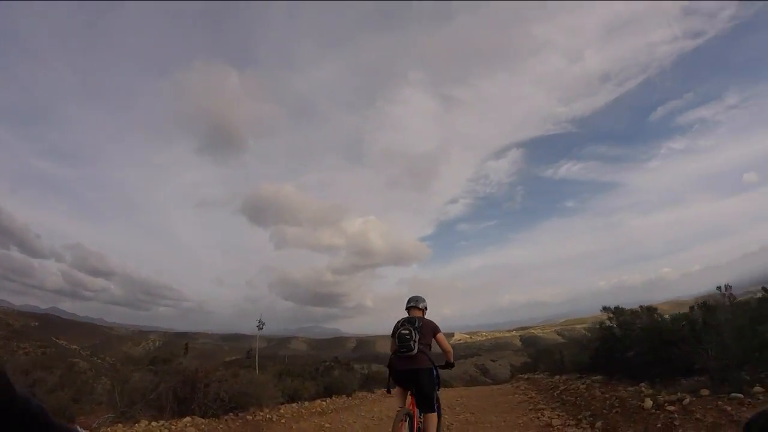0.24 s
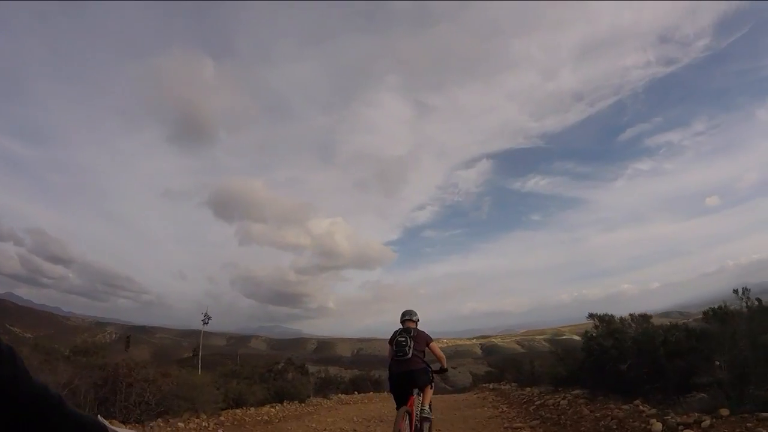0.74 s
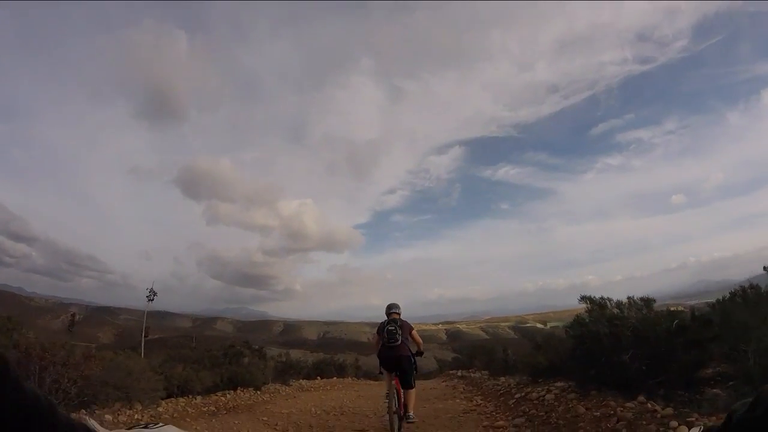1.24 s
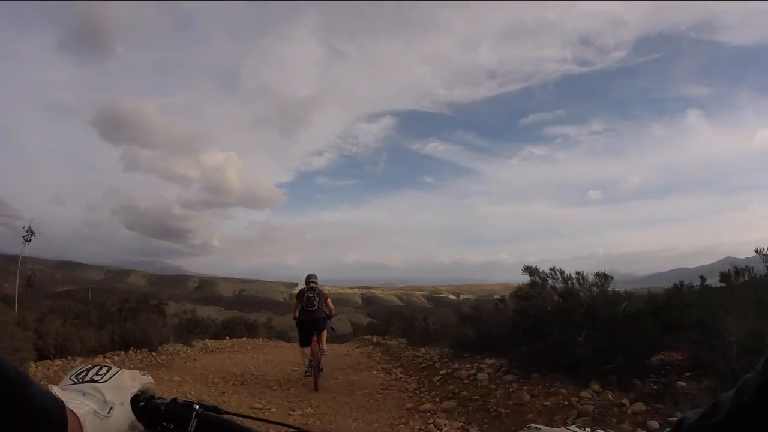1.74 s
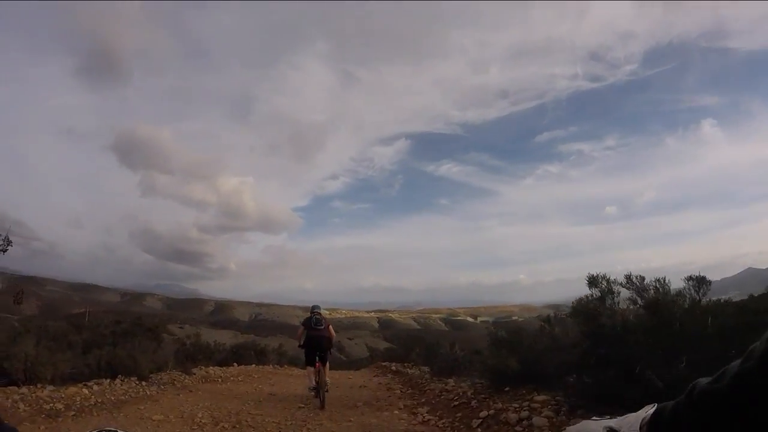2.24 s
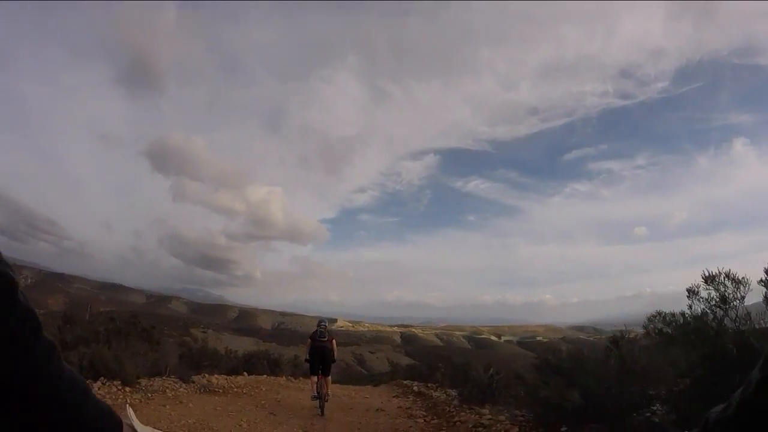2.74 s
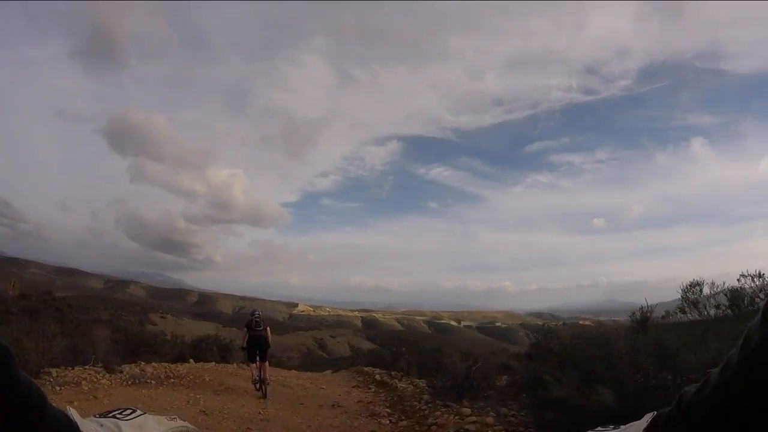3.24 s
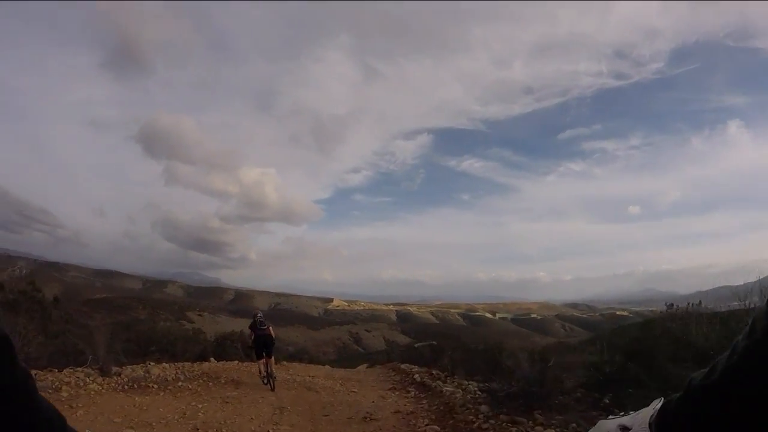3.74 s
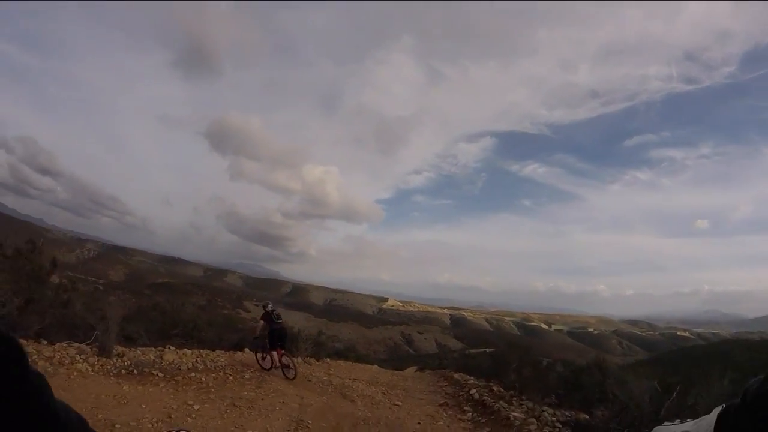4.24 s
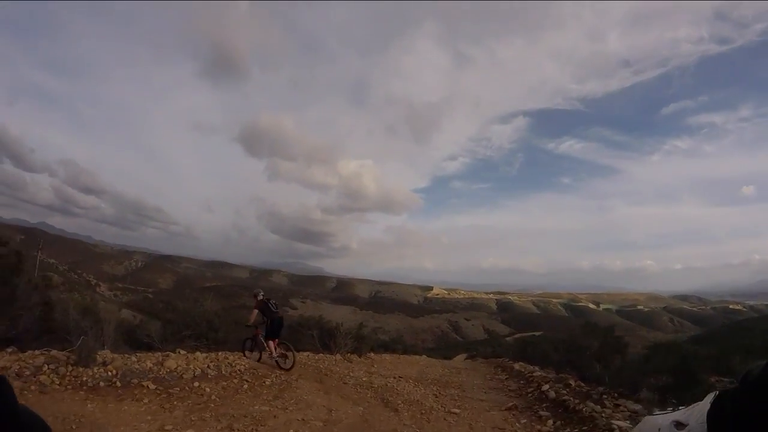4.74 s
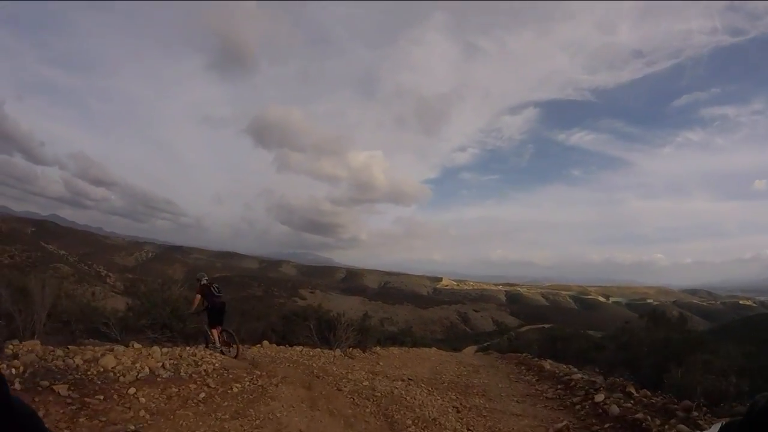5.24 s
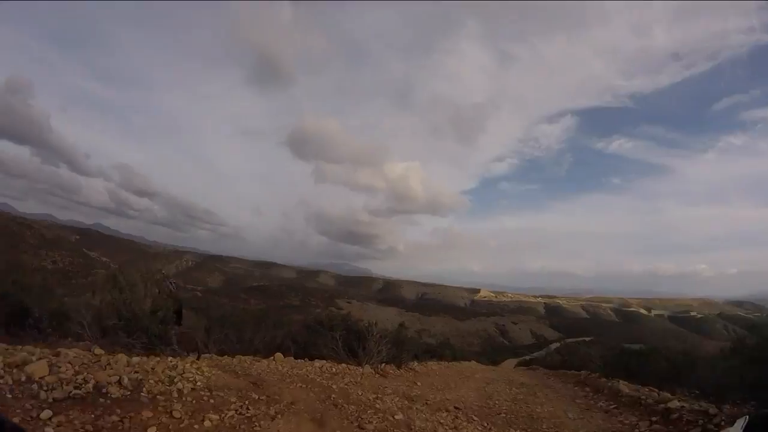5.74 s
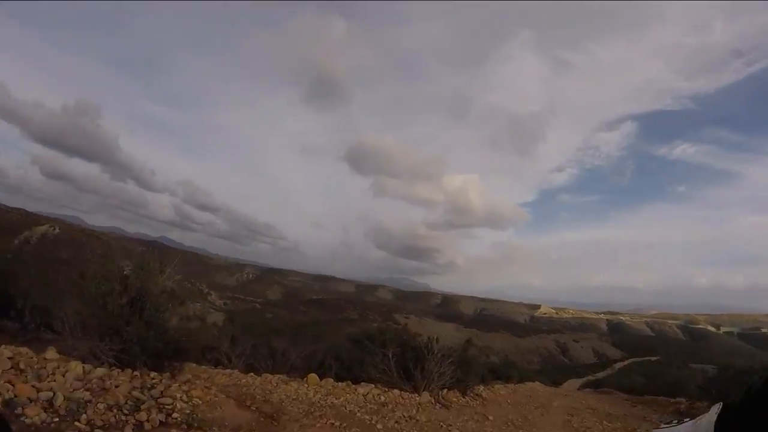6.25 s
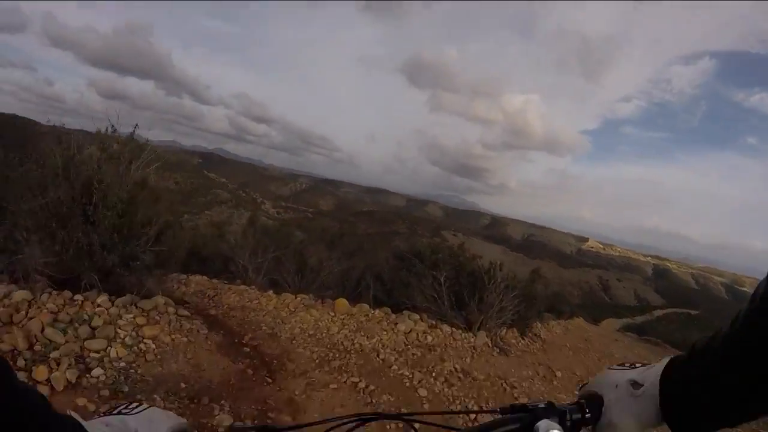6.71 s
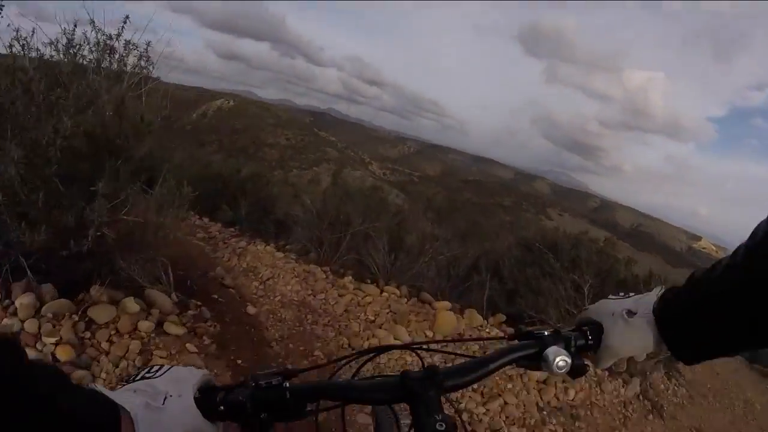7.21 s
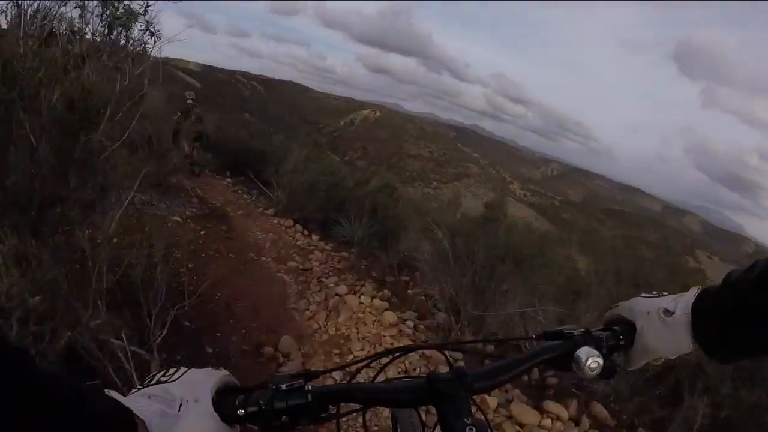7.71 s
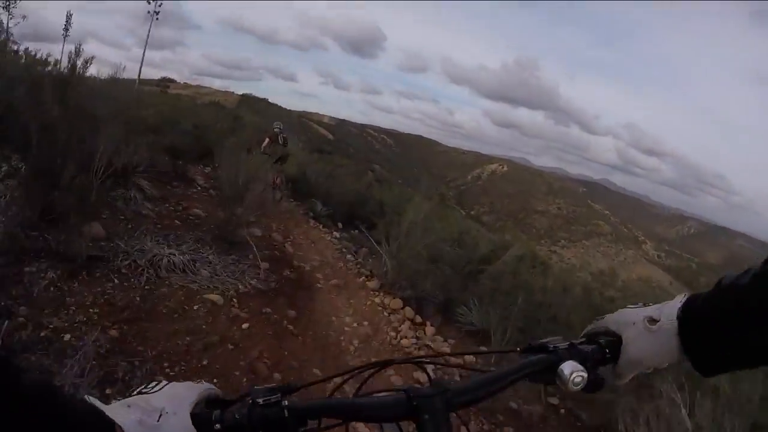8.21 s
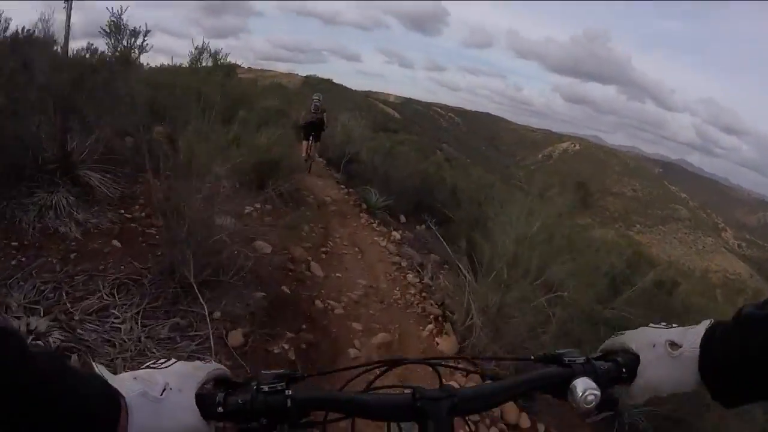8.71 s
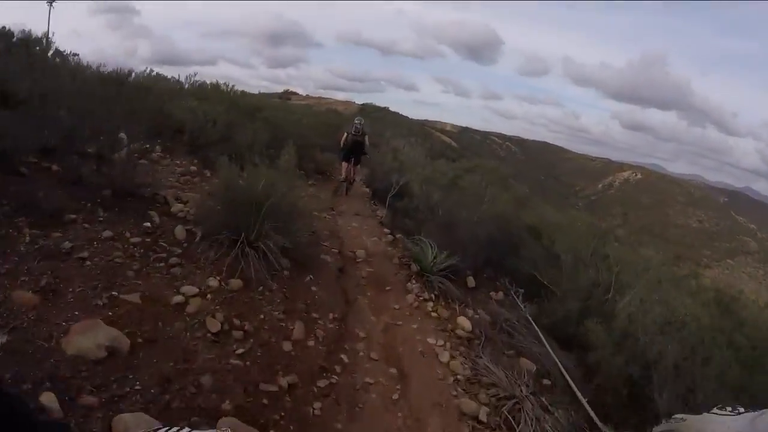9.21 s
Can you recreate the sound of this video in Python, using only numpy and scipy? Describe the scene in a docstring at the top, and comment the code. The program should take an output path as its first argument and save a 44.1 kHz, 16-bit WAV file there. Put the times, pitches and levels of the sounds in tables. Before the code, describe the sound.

A chest-worn microphone in a hard case, outdoors with no echo. From 0 to 1.9 s, low wind rumble and buffeting, strongest at the start, cover muffled tyre rolling, fine gravel crunch and hollow stone knocks, with a sharp cluster near 1.5 s. Wind drops out by about 2.3 s, leaving scattered knocks and ticks. Around 4.1-4.5 s the ground roughens, with frame and chain rattles. Thin, very high disc-brake chirps begin at 3.6 s and flutter repeatedly from 4.7 to 6 s. At 6.4 s a hard, dead clunk bounces quickly. Wind returns from 6.7 s, gusting and flapping heavily at 7.3-8.2 s, with more squeaks and one loud, piercing squeal at 8.1 s. Wind then drops abruptly; from 8.3 s to the end at about 9.5 s, knocks, bright snaps and clattering fittings crowd together over louder crunching, with a rumbling gust near 9.1 s.

```python
"""A stony dirt trail on an open hillside: a mountain bike rolls down it, heard from a hard case on the rider's chest.
Tyres crunch as coloured impulses, noise and pebble clicks; rocks knock as damped modes with ticks and snaps.
Loose patches rattle the frame, fittings and chain; clunks land as short pushes with a crack on top.
A disc brake squeals in high chirps, gliding tones that swell and fade with the grip of the pad.
Wind is filtered noise: slow rumble, faster buffeting and a flapping in the strongest air."""
import sys
import numpy as np
from scipy import signal
from scipy.fft import rfft, irfft, next_fast_len
from scipy.io import wavfile
from scipy.ndimage import uniform_filter1d, map_coordinates

SR = 44100
rng = np.random.default_rng(int(sys.argv[2]) if len(sys.argv) > 2 else 0)


def put_to_file(sound):
    """Save the sound as 16-bit audio at rate SR, in the file named by the first command-line argument."""
    columns = np.atleast_2d(sound).T  # one column per channel
    safe = np.clip(columns, -1, 1)
    whole_steps = np.round(safe * 32767)
    wavfile.write(sys.argv[1], SR, whole_steps.astype(np.int16))


N = 417627

# tyres on the ground, levels before the trims in tyres(): start_s, roll_level_db, crunch_level_db
TRAIL_LEVELS = [(0.0, -44, -56), (0.53, -46, -58.5), (1.55, -45.5, -57), (1.69, -42.5, -57.5),
                (2.0, -44.5, -58.5), (2.37, -43, -58.5), (3.14, -45, -59), (4.33, -37.5, -52),
                (4.51, -41, -57), (5.72, -39.5, -53.5), (6.62, -37.5, -51), (8.04, -39, -53),
                (8.5, -37.5, -51), (8.555, -43.5, -54.5), (8.6, -39, -52), (9.26, -38.5, -49.5),
                (9.47, -34.5, -49)]
# colour of stones thudding through the bike: frequency_hz, relative_gain_db
ROLL_COLOUR = [(40, -35.5), (120, -8), (200, -4), (275, 3), (400, -1.5), (580, -4), (780, -0.5), (920, 3),
               (1100, -6.5), (1300, -9.5), (1550, -21.5), (2000, -36), (3000, -40), (8000, -65)]
# colour of sand and gravel hiss: frequency_hz, relative_gain_db
CRUNCH_COLOUR = [(700, 5), (1500, 9.5), (2000, 0.5), (2650, 5.5), (3000, -4), (3650, 7), (4200, -3),
                 (5400, 0.5), (6100, -1), (6900, 1), (8200, -6.5), (11000, -14), (15000, -21)]
# colour of clicking pebbles: frequency_hz, relative_gain_db
PEBBLE_COLOUR = [(700, -9), (1500, -1), (2000, -8.5), (2650, 1), (3050, -6), (3650, 6), (4300, -6.5),
                 (6900, -1), (9000, -1), (15000, -26)]


def tyres(roll_trim_db=1.22, crunch_trim_db=1.6, pebble_db=-4.0):
    """Stones pass under the tyres in clumps: each clump thuds through the bike; sand hisses and pebbles crackle."""
    roll_db, crunch_db = curves(TRAIL_LEVELS)
    clumps = np.tanh(wobble(50))

    impacts = stones(rate=800, spread_db=0.5) + 0.64 * rng.standard_normal(N)
    thuds = even(colour(impacts, ROLL_COLOUR), span=0.17)
    rolling = amp(roll_db + roll_trim_db + 3.0 * clumps + 0.61 * wobble(70)) * thuds

    grains = rng.standard_normal(N) + 0.5 * stones(rate=1800, spread_db=2)
    sand = amp(1.36 * wobble(70)) * even(colour(grains, CRUNCH_COLOUR), span=0.12)
    crackle = amp(pebble_db) * even(colour(pebbles(), PEBBLE_COLOUR), span=0.17)
    crunch = amp(crunch_db + crunch_trim_db + 2.9 * clumps) * (sand + crackle)
    return rolling + crunch


def ground(s):
    """Rolling and crunch level of the trail in dB at time s, before the tyre trims."""
    when, roll_db, crunch_db = np.transpose(TRAIL_LEVELS)
    return np.interp(s, when, roll_db), np.interp(s, when, crunch_db)


CLUSTER_S = 0.018  # the clicks of one pebble cluster start within this time


def pebbles(count=6500, size=5):
    """Small stones click against each other in clusters; the stones of a cluster are of about one size."""
    when, pitch, life, strength = rng.random((count, 4)).T[:, :, None]
    clusters = np.repeat(rng.random((count // size, 2)), size, axis=0)
    cluster_when, cluster_pitch = clusters.T[:, :, None]
    t = np.arange(SR // 140) / SR
    hz = 1500 * 2.7 ** cluster_pitch * 1.9 ** pitch
    t60 = 0.003 + 0.005 * life
    db = -3.5 * np.log(strength + 0.04)  # a few strike much harder
    clicks = amp(db - 60 * t / t60) * np.sin(2 * np.pi * hz * t) * (1 - np.exp(-t * hz))
    first_sample = (cluster_when * N + when * CLUSTER_S * SR).astype(int)
    place = first_sample + np.arange(len(t))
    return unit(np.bincount(place.ravel(), clicks.ravel(), N)[:N])


# hard blows of rocks and parts, tick and snap before the trims in knocks():
# start_s, knock_level_db, tick_level_db, snap_level_db, stone_pitch_hz
HARD_BLOWS = [(0.436, -21, -57, -41.5, 3600), (0.733, -28.5, -62, -38.5, 3600),
              (0.851, -41, -46, -37, 3700), (0.929, -41, -44.5, -50, 3640), (1.082, -18, -32, -43.5, 3590),
              (1.241, -30, -54, -34.5, 3630), (1.409, -26, -67, -36, 3600), (1.5192, -30, -42, -41, 3200),
              (1.530, -18.5, -50, -32, 2680), (1.5336, -16.5, -35, -20, 3670), (1.586, -35, -45, -47, 3740),
              (1.622, -23.5, -53, -60, 2600), (1.671, -21.5, -32.5, -43, 3360),
              (1.747, -25.5, -51, -60, 2580), (2.088, -36, -43.5, -64, 2530),
              (2.156, -25.5, -61, -65, 2600), (2.247, -36, -45, -43.5, 2690), (2.264, -39, -46, -48, 3630),
              (2.288, -21.5, -46, -42, 3550), (2.308, -34, -47, -49, 2700), (2.509, -38, -54, -40, 3660),
              (2.6768, -48, -54, -35, 3630), (2.683, -23, -35, -34, 3610), (2.864, -33, -45.5, -58, 3650),
              (2.979, -48, -47, -59, 2630), (3.061, -27, -44.5, -46, 3540), (3.347, -24.5, -47, -52, 3560),
              (3.361, -34, -45, -52, 3600), (3.489, -29, -55, -45, 3680), (3.609, -30, -48, -32.5, 2390),
              (4.002, -22.5, -44, -56, 2600), (4.101, -23, -43, -56, 2690), (4.176, -21.5, -46, -45, 3620),
              (4.282, -20, -42, -56, 3560), (4.303, -14.5, -40, -52, 2500), (4.322, -25, -45, -45, 3640),
              (4.37, -24, -52, -55, 2600), (4.481, -29, -47, -48, 3700), (4.546, -33, -43.5, -56, 3700),
              (4.66, -22, -64, -63, 3600), (4.833, -25, -40.5, -50, 3710), (4.853, -40, -44, -54, 3540),
              (4.954, -33, -44, -48, 2720), (4.968, -43, -49, -52, 3500), (5.033, -27, -43.5, -49, 3600),
              (5.299, -26, -41.5, -51, 3680), (5.402, -42, -46.5, -53, 2200),
              (5.511, -25.5, -41, -43, 3950), (5.767, -20.5, -54, -55, 2600), (5.878, -28, -58, -54, 2400),
              (5.898, -42, -40, -50, 3580), (6.081, -22, -42, -52, 2030), (6.3, -40, -40, -49, 3560),
              (6.4529, -18, -39, -48, 2500), (6.63, -34, -53, -51, 2600), (6.978, -21, -39.5, -44, 3040),
              (7.139, -21, -48, -54, 2580), (7.346, -25, -40, -42, 2900), (7.489, -33, -42, -31, 3480),
              (7.976, -30, -41, -36, 3850), (8.137, -24.5, -52, -53, 2630), (8.254, -20.5, -64, -59, 2600),
              (8.3797, -24, -38, -31.5, 3460), (8.494, -32, -38.5, -45, 3670),
              (8.568, -37, -51, -36.5, 3600), (8.691, -27, -45, -43, 3600), (8.733, -37, -43, -39, 3580),
              (8.858, -35, -47, -33, 3650), (8.899, -36, -43, -46, 3600), (8.945, -38, -42, -45, 3420),
              (8.974, -22, -38, -51, 3730), (9.001, -33, -37, -37, 3700), (9.05, -32, -31.5, -37, 3740),
              (9.087, -27, -36.5, -38, 3520), (9.149, -27, -37, -39, 3670), (9.194, -28, -42, -36, 3560),
              (9.232, -46, -42, -27, 3430), (9.29, -18, -58, -51, 3630), (9.298, -20, -31, -37, 3680),
              (9.31, -22, -25, -30, 3640), (9.356, -25, -33.5, -34, 3600), (9.39, -25, -41, -38, 3600)]
# what a blow on the bike rings in the case, before random scatter: pitch_hz, level_db, t60_s
CASE_MODES = [(260, -34, .03), (467, 3.5, 0.019), (674, 6, 0.023), (926, 11, 0.023), (1098, 8, 0.012),
              (1309, -1.5, 0.03), (1650, -20, 0.01)]
# a struck stone's own click, before random scatter: pitch_ratio (times stone pitch), level_db, t60_s
STONE_CLICK_MODES = [(0.996, 3, 0.027), (1.39, -10, 0.015), (0.75, -13, 0.0089)]
# colour of the dry tick: frequency_hz, relative_gain_db
TICK_COLOUR = [(700, -3.5), (1700, -9.5), (2600, -5.5), (3000, -12), (3650, 1), (4300, -9), (6000, -19.5),
               (12000, -48)]
# colour of the bright snap: frequency_hz, relative_gain_db
SNAP_COLOUR = [(1500, -11.5), (4500, -4.5), (7000, -2.5), (10000, -16), (15000, -19)]


def knocks():
    """Each blow has a hollow knock, a dry tick with the stone's own click, and a bright snap."""
    body, ticks, snaps = np.zeros((3, N))
    for s, knock_db, tick_db, snap_db, stone_hz in list(HARD_BLOWS) + stray_knocks():
        knock = ring(CASE_MODES, attack=0.00079)
        stone_modes = np.multiply(STONE_CLICK_MODES, [stone_hz, 1, 1])
        click = ring(stone_modes, attack=0.00026, scatter_db=6.5, detune=0.016)
        add(body, s + 0.00065, amp(knock_db) * knock)
        add(body, s + 0.001052, amp(tick_db + 5.5) * click)
        add(ticks, s + 0.000977, burst(tick_db + 11.5, t60=0.031, spike=3.2))
        add(snaps, s + 0.001008, burst(snap_db + 7, t60=0.013, spike=4.8))
    return body + colour(ticks, TICK_COLOUR) + colour(snaps, SNAP_COLOUR)


# stray stones: knock over the rolling level, tick and snap over the crunch level, random spread either way
STRAY_KNOCK_DB, STRAY_TICK_DB, STRAY_SNAP_DB, STRAY_SPREAD_DB = 13, 0.5, 6.5, 2


def stray_knocks(count=36):
    """Small stones hit the bike all along the way, harder where the trail is louder; rows as in HARD_BLOWS."""
    place, pitch, *chance = rng.random((count, 5)).T
    s = (np.arange(count) + place) / count * N / SR  # one in each equal slice of time
    roll_db, crunch_db = ground(s)
    levels = np.array([roll_db + STRAY_KNOCK_DB, crunch_db + STRAY_TICK_DB, crunch_db + STRAY_SNAP_DB])
    levels = levels + STRAY_SPREAD_DB * (2 * np.array(chance) - 1)
    stone_hz = 2000 * 2 ** pitch
    return list(zip(s, *levels, stone_hz))


# patches of loose stones: start_s, length_s (the rattle lasts 1.4 times this),
# chatter_level_db (before a 1 dB lift), frame_thud_level_db
LOOSE_PATCHES = [(0.034, 0.021, -35, -32.5), (1.222, 0.072, -37, -37.5), (1.536, 0.081, -40.5, -45),
                 (1.805, 0.016, -27, -35), (1.883, 0.018, -33, -61), (2.286, 0.021, -37, -36.5),
                 (3.636, 0.02, -29.5, -30.5), (4.094, 0.018, -25.5, -42), (4.173, 0.012, -32.5, -33),
                 (4.242, 0.025, -24.5, -32), (4.308, 0.091, -31.5, -35.5), (4.426, 0.019, -29, -33.5),
                 (4.777, 0.015, -31, -37), (4.9, 0.029, -43, -31.5), (5.876, 0.026, -33, -51),
                 (6.393, 0.045, -28.5, -32.5), (6.638, 0.021, -44, -32), (6.734, 0.039, -37, -32),
                 (6.781, 0.015, -31, -26.5), (7.732, 0.041, -48, -26), (8.292, 0.021, -50, -31),
                 (8.387, 0.03, -28.5, -27.5), (8.429, 0.043, -35.5, -34), (8.49, 0.019, -40, -28),
                 (8.585, 0.022, -32.5, -32), (8.697, 0.037, -37.5, -35.5), (8.871, 0.03, -40, -32),
                 (9.032, 0.02, -33, -38), (8.794, 0.027, -31.5, -27.5), (8.962, 0.03, -34.5, -24.5),
                 (9.02, 0.15, -44, -31), (9.288, 0.03, -32, -20.5), (9.388, 0.037, -32.5, -25.5)]
# gravel flung by the tyres and by the hardest blows: start_s, length_s, level_db
GRAVEL_SCATTERS = [(1.54, 0.11, -51), (3.512, 0.031, -45), (4.718, 0.053, -44.5), (4.999, 0.02, -46),
                   (6.397, 0.034, -60), (8.569, 0.02, -43), (8.793, 0.03, -45.5), (9.39, 0.019, -47.5)]
# colour of the frame's thud: frequency_hz, relative_gain_db
THUD_COLOUR = [(70, -9), (160, -9.5), (260, 4), (370, -1), (500, -5.5), (800, -3), (2000, -65.5)]
# colour of the fittings' chatter: frequency_hz, relative_gain_db
CHATTER_COLOUR = [(150, -44), (400, -16), (650, 2), (950, 10), (1300, -4.5), (1600, -17.5), (2100, -38),
                  (5000, -54.5)]
# colour of the chain's hard, bright clank: frequency_hz, relative_gain_db
CLANK_COLOUR = [(200, -36), (500, -16), (750, 1), (1020, 9.5), (1300, 5), (1600, -10.5), (2100, -23),
                (2650, -15), (3050, -23), (3650, -15), (4400, -35), (8000, -54)]
CLANK_RANGE_DB = 7  # chatter this far above the thud is all clank
# gravel spray: dB relative to the listed chatter, and dB gained per dB of crunch above FIRM_GROUND_DB
SPRAY_DB, SPRAY_FOLLOWS, FIRM_GROUND_DB = -20, 0.5, -53


def rattles():
    """Quick contacts thud in the frame, shake chain and fittings, and spray more gravel where the crunch is louder."""
    thud, chatter, clank, spray = np.zeros((4, N))
    for s, length, chatter_db, thud_db in LOOSE_PATCHES:
        u = np.linspace(0, 1, int(1.4 * length * SR))
        shape = np.minimum(u / 0.06, 1) * np.cos(u * np.pi / 2)
        loose_db = SPRAY_FOLLOWS * (ground(s)[1] - FIRM_GROUND_DB)
        hard = np.clip((chatter_db - thud_db) / CLANK_RANGE_DB, 0, 1)
        shake = amp(chatter_db + 1.0) * shape
        add(thud, s, amp(thud_db) * shape)
        add(chatter, s, np.sqrt(1 - hard) * shake)
        add(clank, s, np.sqrt(hard) * shake)
        add(spray, s, amp(chatter_db + SPRAY_DB + loose_db) * shape)
    for s, length, db in GRAVEL_SCATTERS:
        fade = np.cos(np.linspace(0, np.pi / 2, int(length * SR)))
        add(spray, s, amp(db) * fade)

    contacts = stones(rate=1500, spread_db=0.5)  # shared by frame and fittings
    chain_contacts = stones(rate=1500, spread_db=0.5)
    frame = thud * even(colour(contacts, THUD_COLOUR), span=0.013)
    fittings = chatter * even(colour(contacts, CHATTER_COLOUR), span=0.011)
    chain = clank * even(colour(chain_contacts, CLANK_COLOUR), span=0.0089)
    gravel = spray * unit(colour(rng.standard_normal(N) + pebbles(), CRUNCH_COLOUR))
    return frame + fittings + chain + gravel


# a hard, dead clunk that bounces: start_s, push_level_db (before a 0.5 dB cut), crack_level_db (before colour)
CLUNK_HITS = [(6.3935, -6.5, -27), (6.4002, -7.5, -26), (6.407, -4.5, -30), (6.454, -16.5, -20)]
# colour of the crack on top: frequency_hz, gain_db
CRACK_COLOUR = [(150, -20), (600, 0), (1400, -2), (1900, -1), (2500, 9), (3050, -9), (3650, -6),
                (4500, -24), (10000, -42)]


def clunks(width=0.00032, spike=10):
    """A stiff contact pushes the case once, with a short crack on top."""
    pushes, cracks = np.zeros((2, N))
    t = np.arange(-SR // 200, SR // 200) / SR
    push = (1 - (t / width) ** 2) * np.exp(-(t / width) ** 2 / 2)
    for s, push_db, crack_db in CLUNK_HITS:
        add(pushes, s + t[0], amp(push_db - 0.5) * push)
        add(cracks, s, burst(crack_db, t60=0.01, spike=spike))
    return pushes + colour(cracks, CRACK_COLOUR)


# touches of the pad on the brake disc, pitch before waver and level before the trim in brake():
# start_s, end_s, firmest_share (of the length), first_pitch_hz, last_pitch_hz, level_db
PAD_TOUCHES = [(3.576, 3.58, 0.46, 9040, 9060, -36.5), (3.781, 3.813, .3, 12700, 12800, -59),
               (3.98, 4.027, 1, 9130, 9100, -35), (4.737, 4.773, .4, 8520, 8430, -57),
               (4.725, 4.746, .5, 7300, 7200, -52), (4.828, 4.86, 0.55, 7200, 7270, -41),
               (4.937, 4.968, 0.8, 7280, 7230, -36.5), (5.094, 5.096, .5, 8940, 9020, -36),
               (5.209, 5.311, 0.068, 9160, 9080, -34.5), (5.336, 5.425, 0.15, 9320, 9070, -34),
               (5.454, 5.483, .4, 9360, 9240, -45), (5.568, 5.596, 0.26, 9290, 9220, -47),
               (5.682, 5.716, .2, 9360, 9220, -41.5), (5.733, 5.795, .7, 9400, 9560, -57),
               (5.802, 5.868, 0.4, 9320, 9290, -39), (5.888, 6.058, 0.25, 9080, 9080, -32),
               (6.123, 6.136, .5, 8470, 8500, -56), (6.193, 6.222, 0.58, 7230, 7320, -57),
               (6.31, 6.325, .5, 7200, 7300, -51), (6.327, 6.367, 0.25, 8500, 8330, -48),
               (6.441, 6.486, 0.18, 8440, 8600, -40), (6.48, 6.498, .4, 8800, 9300, -52),
               (6.523, 6.555, .6, 10000, 10200, -62), (6.64, 6.69, 0.54, 9350, 9560, -54),
               (6.705, 6.726, .5, 11720, 11780, -54), (6.985, 7.012, 0.6, 9160, 9500, -47),
               (7.014, 7.03, .4, 9950, 10150, -56), (7.058, 7.09, .5, 9350, 9450, -35.5),
               (7.083, 7.096, .5, 7650, 7600, -53), (7.09, 7.103, 0.6, 9650, 10040, -35),
               (7.121, 7.127, .4, 9900, 9830, -34), (7.141, 7.198, 0.1, 9700, 9300, -48),
               (7.206, 7.225, 0.72, 9300, 9040, -37), (7.469, 7.507, 0.27, 8540, 8800, -44),
               (7.528, 7.575, 0.92, 9370, 9450, -33), (7.601, 7.759, 0.28, 9390, 9340, -31.5),
               (8.099, 8.1, .5, 8540, 8580, -27.5), (8.114, 8.144, 0.71, 8490, 8570, -17),
               (8.149, 8.196, .05, 8620, 8580, -27), (8.204, 8.22, .4, 8800, 8750, -32)]
GRIP_FADE_DB_PER_S = 119  # a squeal swells to its firmest moment and fades from it at this rate
DISC_DAMPING_DB_PER_S = 795  # added fade as the disc rings on briefly after the pad lets go


def brake(trim_db=-2.1):
    """The disc sings one high tone while the pad grips, fluttering; light contact wavers and rasps, firm is purer."""
    out, t = np.zeros(N), np.arange(N) / SR
    edge, tail = 0.017, 0.06  # seconds of onset and of ring-on
    waver_hz = 44 * wobble(100) + 22 * wobble(400)
    slip = 0.3 * (wobble(240) + 1j * wobble(240))
    rasp = 0.04 * (wobble(1100) + 1j * wobble(1100))
    flutter = amp(3 * wobble(90))
    for start, end, firmest, first_hz, last_hz, db in PAD_TOUCHES:
        span = (t > start - edge / 2) & (t < end + tail)
        now = t[span]
        loose = np.interp(db, [-30, -18], [1, 0.3])  # quieter touches are looser
        hz = np.interp(now, [start, end], [first_hz, last_hz]) + loose * waver_hz[span]
        swell = np.sin(np.clip((now - start) / edge + 0.5, 0, 1) * np.pi / 2) ** 2
        grip_db = -GRIP_FADE_DB_PER_S * np.abs(now - start - firmest * (end - start))
        release_db = -DISC_DAMPING_DB_PER_S * np.maximum(now - end, 0)
        roughness = 1 + loose * (slip[span] + rasp[span])
        tone = np.real(roughness * np.exp(2j * np.pi * np.cumsum(hz) / SR))
        tone = tone * swell * flutter[span] * amp(grip_db + release_db)
        # level is set over the touch and its edge, whatever the envelope
        rms = np.sqrt(np.sum(tone ** 2) / ((abs(end - start) + edge) * SR))
        out[span] += amp(db) * tone / rms
    return out * amp(trim_db)


# steady air on the case, before gusts and flurries: start_s, buffet_level_db
AIR_LEVELS = [(0.0, -20), (0.3, -30.5), (1.3, -30.5), (1.45, -36), (1.86, -34.5), (1.98, -48.5),
              (2.15, -48.5), (2.3, -63), (2.8, -56), (4.3, -51), (6.2, -49.5), (6.7, -40), (6.8, -30.5),
              (7.0, -28), (7.52, -24), (7.95, -20.5), (8.14, -22.5), (8.24, -41.5), (8.7, -34.5),
              (9.0, -35), (9.47, -26)]
# single gusts and lulls: peak_s, half_width_s (to 1/e), buffet_change_db, rumble_change_db
GUSTS_AND_LULLS = [(0.08, 0.068, 3, 2.5), (0.46, 0.048, 8.5, 2), (0.72, 0.062, 1.5, 2.5),
                   (1.27, 0.1, 4, 1.5), (1.5, 0.03, 7, 3), (1.75, 0.2, 1, -1.5), (7.295, 0.018, 6.5, 13),
                   (7.372, 0.038, 11, 6), (7.47, 0.071, -1, -8.5), (7.611, 0.026, 14, 15),
                   (7.662, 0.033, 8, 10), (7.745, 0.03, 9.5, 12.5), (7.8, 0.02, 7.5, 6.5),
                   (7.87, 0.051, -3.5, 10.5), (8.02, 0.048, 0.5, 14.5), (8.157, 0.016, 6.5, -5),
                   (9.09, 0.085, 6.5, 14), (9.33, 0.068, -5, 2.5)]
# colour of the slow rumble: frequency_hz, relative_gain_db
RUMBLE_COLOUR = [(8, -15), (18, 3), (29, -3.5), (45, -10.5), (70, -19.5), (120, -27), (300, -80.5),
                 (900, -130)]
# colour of the buffeting: frequency_hz, relative_gain_db
BUFFET_COLOUR = [(25, -16.5), (50, 4), (75, 4), (120, -5.5), (180, -10.5), (260, -20.5), (450, -32),
                 (900, -37), (2000, -85), (6000, -120)]
# colour of the higher flapping in the fastest air: frequency_hz, relative_gain_db
FLAP_COLOUR = [(100, -20), (220, -1.5), (400, -9), (700, -20), (1100, -39), (2500, -63)]
# rumble: dB when the steady air is at BREEZE_DB, dB gained per dB of air, depth of its own swells in dB
RUMBLE_DB, RUMBLE_FOLLOWS, SWELL_DB, BREEZE_DB = -25, 0.48, 2.5, -30
GUST_DB = 2  # depth of quick random flurries on the buffeting
# flapping: dB when the buffeting is at GALE_DB, dB gained per dB of buffeting
FLAP_DB, FLAP_FOLLOWS, GALE_DB = -24.5, 1.6, -12


def wind():
    """Large eddies rock the case, smaller ones flutter and, in the fastest air, flap; gusts and lulls move them."""
    air_db, = curves(AIR_LEVELS)
    t = np.arange(N) / SR
    rumble_db = RUMBLE_DB + RUMBLE_FOLLOWS * (air_db - BREEZE_DB) + SWELL_DB * wobble(7.6)
    buffet_db = air_db + GUST_DB * wobble(16)
    for s, width, flutter_db, push_db in GUSTS_AND_LULLS:
        swell = np.exp(-((t - s) / width) ** 2)
        buffet_db = buffet_db + flutter_db * swell
        rumble_db = rumble_db + push_db * swell
    flap_db = FLAP_DB + FLAP_FOLLOWS * np.minimum(buffet_db - GALE_DB, 2)  # growth stops 2 dB above GALE_DB
    rumble = even(colour(rng.standard_normal(N), RUMBLE_COLOUR), span=0.15)
    buffet = even(colour(rng.standard_normal(N), BUFFET_COLOUR), span=0.046)
    flap = even(colour(rng.standard_normal(N), FLAP_COLOUR), span=0.065)
    return amp(rumble_db) * rumble + amp(buffet_db) * buffet + amp(flap_db) * flap


def ring(modes, attack, scatter_db=4.5, detune=0.029):
    """One blow on damped modes, peak 1; no two blows land alike."""
    t = np.arange(SR // 12) / SR
    hz, db, t60 = np.transpose(modes)[:, :, None]
    size, shift = rng.standard_normal((2, len(modes), 1))
    sign = rng.choice([-1, 1], (len(modes), 1))  # depends on where the blow lands
    decay = amp(db + scatter_db * size - 60 * t / t60)
    tones = np.sin(2 * np.pi * hz * (1 + detune * shift) * t)
    x = np.sum(sign * decay * tones, 0) * (1 - np.exp(-t / attack))
    return x / np.abs(x).max()


def burst(db, t60, spike):
    """A contact crack: one sharp spike, then noise that falls 60 dB in t60 seconds."""
    t = np.arange(SR // 20) / SR
    return amp(db - 60 * t / t60) * (rng.standard_normal(len(t)) + spike * (t == 0))


def stones(rate, spread_db):
    """Impulses of rms 1 at random times, rate a second on average; sizes have a random spread in dB."""
    size = amp(spread_db * np.minimum(rng.exponential(size=N), 4))
    return unit((rng.random(N) < rate / SR) * size * rng.choice([-1, 1], N))


def wobble(rate):
    """A smooth random curve, rate knots a second."""
    knots = rng.standard_normal(int(N * rate / SR) + 4)
    return map_coordinates(knots, [np.arange(N) * rate / SR])


def colour(x, points):
    """Pass x through a causal minimum-phase filter given as (Hz, dB) points."""
    m = 2 * next_fast_len(N // 2 + SR // 4)
    hz, db = np.transpose(points)
    gain = amp(np.interp(np.log(np.fft.rfftfreq(m, 1 / SR) + 1), np.log(hz), db))
    cepstrum = irfft(np.log(gain))
    cepstrum[1:m // 2] *= 2  # fold the cepstrum forward in time
    cepstrum[m // 2 + 1:] = 0
    return irfft(rfft(x, m) * np.exp(rfft(cepstrum)), m)[:N]


def even(x, span):
    """Take the swells slower than span seconds out of a noise, leaving it at rms 1."""
    envelope = np.abs(signal.hilbert(x, next_fast_len(N))[:N])
    power = uniform_filter1d(envelope ** 2, int(span * SR))
    return unit(x / np.sqrt(np.abs(power) + 0.039 * power.mean()))


def curves(rows):
    """One value per sample for each column after the time."""
    s, *cols = np.transpose(rows)
    return [np.interp(np.arange(N) / SR, s, c) for c in cols]


def add(track, s, sound):
    """Mix a sound into the track at time s."""
    part = track[max(round(s * SR), 0):][:len(sound)]
    part += sound[:len(part)]


def amp(db):
    """Decibels to gain."""
    return 10 ** (np.asarray(db) / 20)


def unit(x):
    """Scale to rms 1."""
    return x / np.sqrt(np.mean(x ** 2) + 1e-20)


def scene():
    """Open hillside: all sounds arrive without echo."""
    return (tyres() + knocks() + rattles() + clunks() + brake() + wind())[None]


TOP_HZ = 15300  # upper band limit


def record(dry):
    """The microphone softly rounds off the strongest peaks; nothing is kept above the band limit."""
    rounded = dry / (1 + (dry / 0.88) ** 6) ** (1 / 6)
    m = next_fast_len(N + SR // 4)
    in_band = np.fft.rfftfreq(m, 1 / SR) < TOP_HZ
    return irfft(rfft(rounded, m) * in_band, m)[:, :N]


dry = scene()
out = record(dry)
put_to_file(out)
```